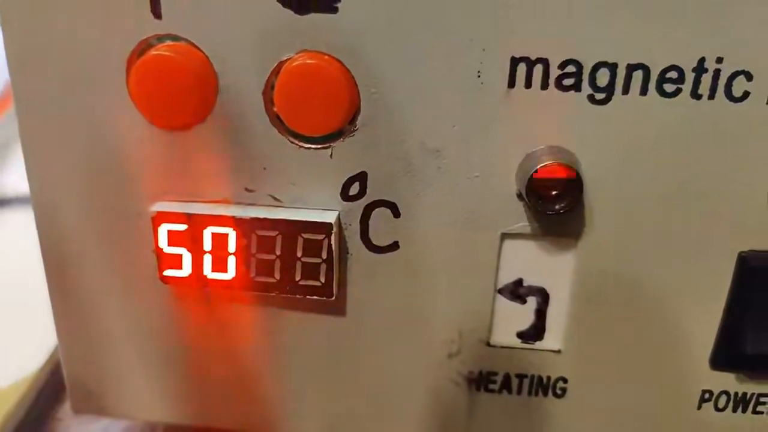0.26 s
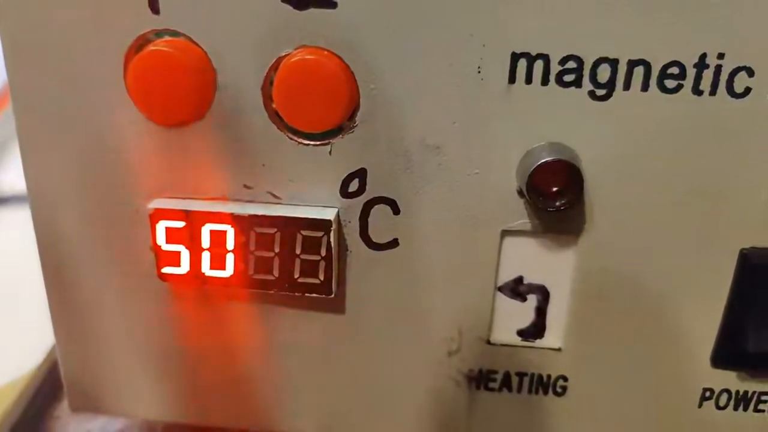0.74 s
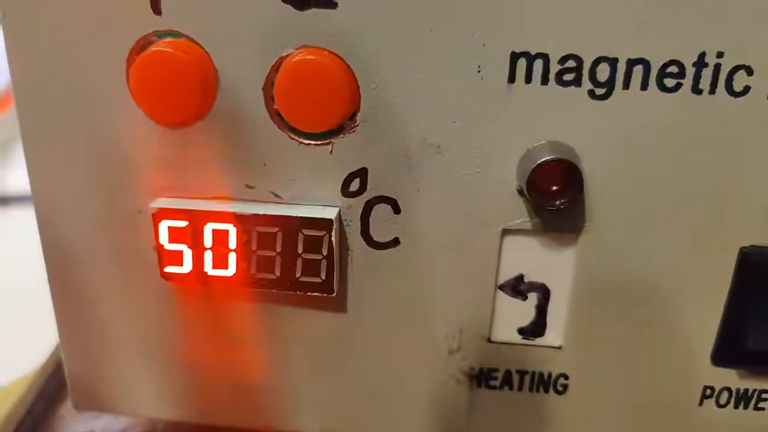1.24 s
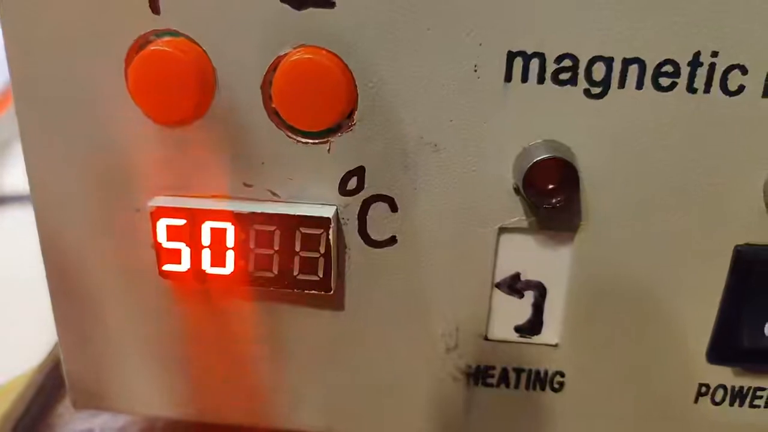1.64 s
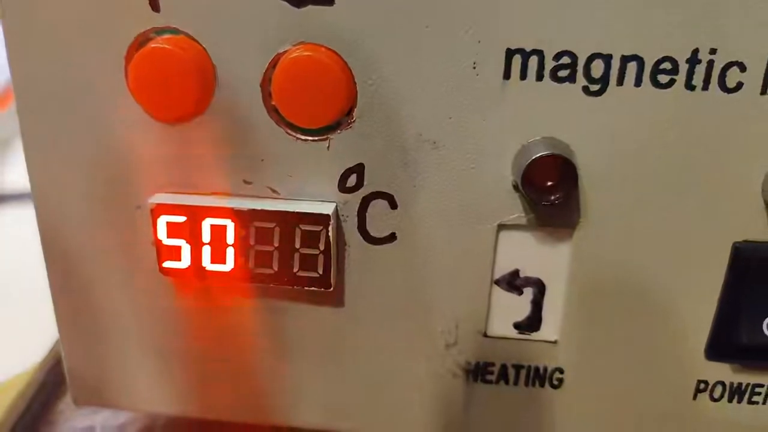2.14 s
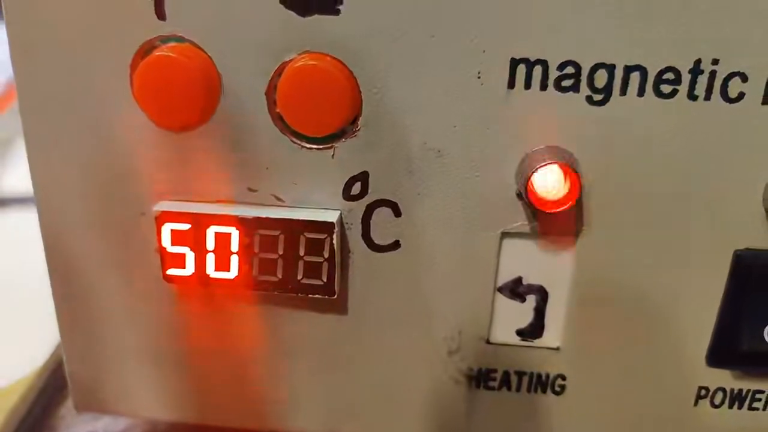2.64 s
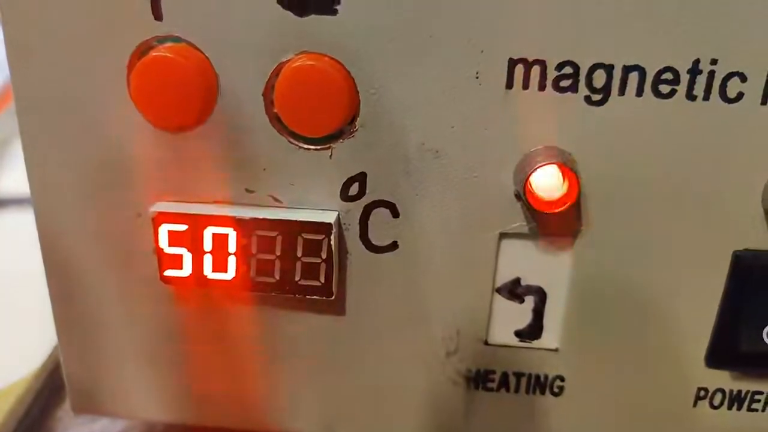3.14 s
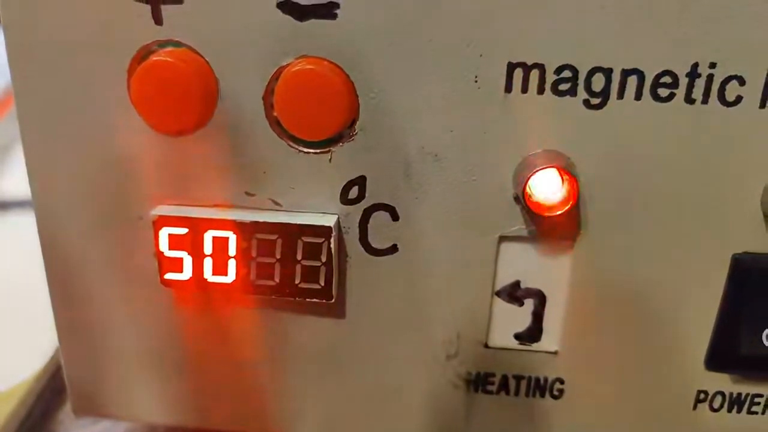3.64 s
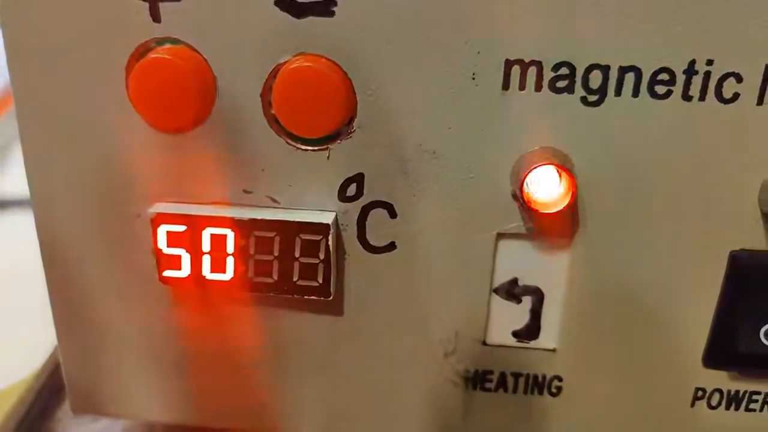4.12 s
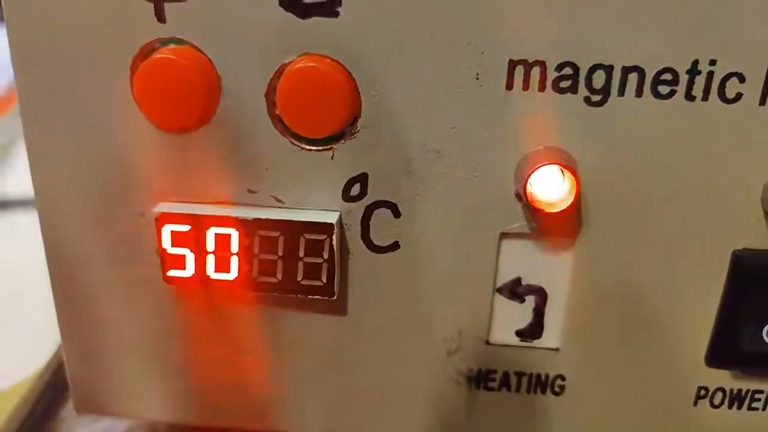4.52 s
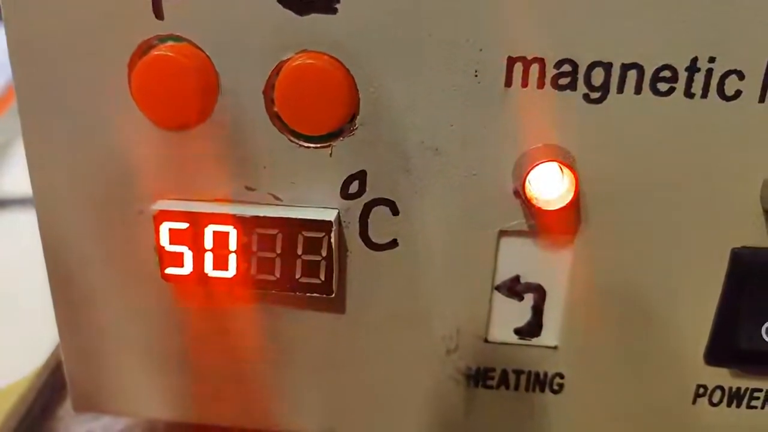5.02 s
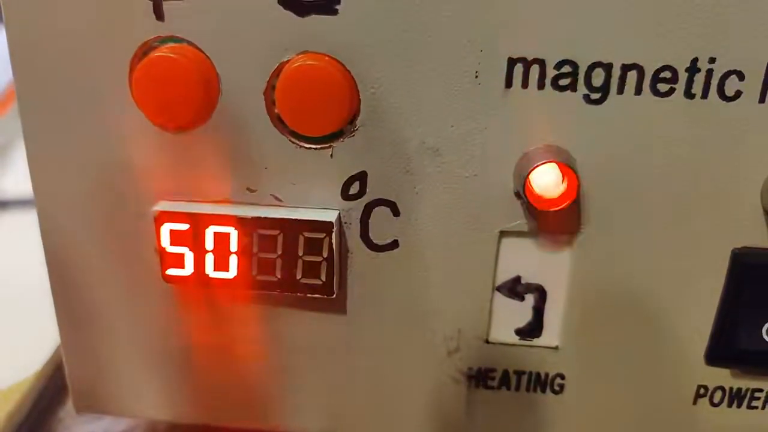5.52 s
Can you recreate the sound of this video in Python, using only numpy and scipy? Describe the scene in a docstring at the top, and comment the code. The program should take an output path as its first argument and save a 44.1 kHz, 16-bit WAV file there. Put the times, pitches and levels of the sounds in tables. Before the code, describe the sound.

A hot-plate stirrer hums low and quiet while its stir bar ticks now and then against the vessel. A small relay clicks lightly twice, and the ticking turns into a fine, steady rattle with a faint whine. The relay then chatters in a much louder run of sharp, uneven clicks for about two seconds and stops, leaving the hum and ticking. It is heard close by in a small room.

```python
"""A low motor hum and light, stray ticks, likely a stir bar against its vessel, close by in a small room.
The heater relay of this hot-plate stirrer clicks twice, then chatters for two seconds: its armature
snaps against the core and bounces in short rattles. Each impact excites the damped modes of the relay's
parts and of the metal case. From the second click on, the ticking is steady and faint tones join it."""
import sys
import numpy as np
from scipy import signal
from scipy.fft import rfft, irfft
from scipy.io import wavfile
from scipy.ndimage import map_coordinates

SR = 44100
rng = np.random.default_rng(int(sys.argv[2]) if len(sys.argv) > 2 else 0)


def materialize(psi):
    """Save the field psi as 16-bit PCM at rate SR to the path in sys.argv[1].

    A 1-D psi becomes a single channel; in a 2-D psi each row is a channel.
    """
    bounded = np.clip(np.atleast_2d(psi).T, -1, 1)
    quanta = np.round(bounded * 32767).astype(np.int16)
    wavfile.write(sys.argv[1], SR, quanta)


N = 254589
TIME = np.arange(N) / SR
BASS_PAN_DB = 8   # left minus right, for motor, whine and case
STEADY_START_S = 2.95   # the steady ticking begins


def from_db(db):
    """Amplitude ratio of a level in decibels."""
    return 10 ** (np.asarray(db) / 20)


def unit_rms(x):
    """Normalisation to an rms of 1."""
    return x / np.sqrt(np.mean(x ** 2) + 1e-20)


def pan(balance_db):
    """Level difference, left minus right, as two gains whose mean is 1."""
    left = from_db(np.atleast_1d(balance_db))
    return 2 * np.array([left, np.ones_like(left)]) / (1 + left)


def per_bin(points, size):
    """Interpolation of (f/Hz, value) points over log frequency, at the bins of an FFT."""
    hz, value = np.transpose(points)
    return np.interp(np.log(np.arange(size // 2 + 1) * SR / size + 1), np.log(hz), value)


def drift(per_s):
    """Smooth random modulation of rms 1, through per_s random values a second."""
    knots = rng.standard_normal(4000)
    return unit_rms(map_coordinates(knots, [TIME * per_s], order=3, mode="wrap"))


def resonate(drive, modes):
    """Modal superposition: damped resonators (f/Hz, bandwidth/Hz, gain/dB) add with alternating signs."""
    out = 0
    for k, (hz, width, db) in enumerate(modes):
        r = np.exp(-np.pi * width / SR)
        poles = [1, -2 * r * np.cos(2 * np.pi * hz / SR), r * r]
        gain = (-1) ** k * from_db(db) * (1 - r * r) / 2
        out = out + gain * signal.lfilter([1, 0, -1], poles, drive + 1e-18)
    return out


def impact_power(events, decay_s):
    """Exponential decay: power jumps at each (t/s, level/dB); decay_s is the amplitude's time constant."""
    power = np.zeros(N)
    for s, db in events:
        power[min(int(s * SR), N - 1)] += from_db(db) ** 2
    return signal.lfilter([1], [1, -np.exp(-2 / (decay_s * SR))], power + 1e-20)


def held_power(spells, edge_s):
    """Sustained excitation: power holds through each (start/s, end/s, level/dB), with soft edges."""
    power = np.zeros(N)
    for start, end, db in spells:
        power[int(start * SR):int(end * SR)] = from_db(db) ** 2
    r = np.exp(-1 / (edge_s * SR))
    return signal.lfilter([1 - r], [1, -r], power + 1e-20)


def micro_hits(per_s, spread_db):
    """Shot noise of rms 1: tiny contacts of uneven force at random moments."""
    force = from_db(spread_db * np.clip(rng.standard_normal(N), -2, 2)) * rng.choice([-1, 1], N)
    return unit_rms(force * (rng.random(N) < per_s / SR))


# spectrum of the room's background: f/Hz, relative spectral level/dB
AIR_SPECTRUM = [(18, -9.5), (30, -5), (45, -19.5), (104, -18), (145, -21.5), (200, -18.5), (360, -24),
                (730, -31), (1320, -33.5), (2400, -39.5), (6500, -46), (10000, -43), (14000, -37.5),
                (15800, -36)]
# likeness of its two sides: f/Hz, correlation coefficient
AIR_CORRELATION = [(60, 0.73), (240, 0.8), (950, -0.17), (3770, -0.31), (15000, -0.089)]
# its balance: f/Hz, left minus right level/dB
AIR_PAN = [(60, 8.5), (240, 6.5), (950, 6.5), (3770, 0.5), (15000, 5)]


def air(rms_db=-59):
    """Partially coherent noise: soft rumble and hiss, alike on both sides in the bass."""
    mid, side = rfft(rng.standard_normal((2, N)))
    alike = np.clip(per_bin(AIR_CORRELATION, N), 0, .98)
    white = np.sqrt(1 + alike) * mid + np.sqrt(1 - alike) * side * [[1], [-1]]
    noise = irfft(white * from_db(per_bin(AIR_SPECTRUM, N)) * pan(per_bin(AIR_PAN, N)), N)
    return from_db(rms_db) * unit_rms(noise)


# spectrum of the room's reflections: f/Hz, relative level/dB
REVERB_SPECTRUM = [(200, 7.5), (400, 12), (600, 7.5), (850, 0.5), (2000, 5.5), (3500, 7.5), (4200, 6),
                   (5800, -1.5), (6700, 0), (7600, -0.5), (8500, 3), (10500, -1.5), (16000, 0)]


def room(sound, t60_s=0.3, first_echo_s=0.00192):
    """Reverberation: dense reflections decay exponentially, different on each side."""
    size = SR // 2
    t = TIME[:size]
    tail = rng.standard_normal((2, size)) * from_db(-60 * t / t60_s)
    tail = irfft(rfft(tail) * from_db(per_bin(REVERB_SPECTRUM, size)), size) * (t > first_echo_s)
    tail /= np.sqrt(np.sum(tail ** 2, axis=1, keepdims=True))
    return signal.fftconvolve(sound, tail, axes=1)[:, :N]


# partials of the stirrer motor's hum: f/Hz, level/dB
MOTOR_PARTIALS = [(18.9, -52), (56.7, -62), (90.3, -66), (120, -75), (182, -73.5)]


def motor(wander_cycles=0.11, waver_db=0.1):
    """Line spectrum of a turning motor: low partials, slightly modulated in level and phase."""
    hum = 0
    for hz, db in MOTOR_PARTIALS:
        amplitude = np.sqrt(2) * from_db(db + waver_db * np.tanh(drift(per_s=2.36)))
        cycles = hz * TIME + wander_cycles * drift(per_s=1.372)
        hum += amplitude * np.sin(2 * np.pi * cycles)
    return hum * pan(BASS_PAN_DB)


# faint tones that accompany the steady ticking: f/Hz, level/dB
WHINE_TONES = [(522.2, -78), (597.5, -80), (635.2, -74), (753.7, -73)]


def whine(gain_db=-1, onset_s=0.067):
    """Superposed pure tones: a thin whine swells in as the steady ticking begins, then holds."""
    tones = sum(from_db(db) * np.sin(2 * np.pi * hz * TIME + rng.uniform(0, 2 * np.pi))
                for hz, db in WHINE_TONES)
    envelope = np.clip((TIME - STEADY_START_S + onset_s) / onset_s, 0, 1)
    return np.sqrt(2) * from_db(gain_db) * envelope * tones * pan(BASS_PAN_DB)


# stray contacts of the stir bar: t/s
STRAY_TICKS = [0.338, 0.3676, 0.4038, 0.592, 0.6036, 0.6403, 0.7074, 0.885, 0.9659, 0.981, 1.0273, 1.2044,
               1.297, 1.3192, 1.3876, 1.4332, 1.439, 1.8361, 2.212, 2.2558, 2.4376, 2.495, 2.616, 2.6339,
               2.75, 2.7822, 2.85, 2.9006, 2.9234]
# modes of the vessel: f/Hz, bandwidth/Hz, gain/dB
VESSEL_RESONANCES = [(625, 81, 3), (780, 164, 0.5), (2860, 880, -13.5), (3170, 133, 1), (3570, 91, 4.5),
                     (4170, 190, -8.5), (4650, 150, -5), (6030, 63, -4), (7870, 1700, -17)]


def stir_bar(stray_db=-42.5, steady_db=-44, ticks_per_s=72, jitter=0.25, fade_db_per_s=0.3, spread_db=2.65):
    """Impact excitation: the bar rings its vessel, with stray ticks at first, then a light rattle."""
    beats = np.arange(400)
    time_scatter, level_scatter = rng.standard_normal((len(beats), 2)).T
    times = STEADY_START_S + (beats + jitter * time_scatter) / ticks_per_s
    levels = steady_db - fade_db_per_s * (times - STEADY_START_S) + spread_db * level_scatter
    steady = [(s, db) for s, db in zip(times, levels) if s < TIME[-1]]
    stray = [(s, stray_db) for s in STRAY_TICKS]
    force = np.sqrt(impact_power(stray, decay_s=0.0042) + impact_power(steady, decay_s=0.0077))
    grain = 0.27 * rng.standard_normal(N) + rng.standard_normal((2, N))   # partly shared by both sides
    return resonate(force * grain, VESSEL_RESONANCES) * pan(balance_db=3)


# armature snaps that stand out: t/s, level/dB
DISTINCT_SNAPS = [(2.0434, -55), (2.0456, -39), (2.952, -38), (3.2576, -46), (3.3554, -44), (3.4868, -49.5),
                  (3.587, -24), (3.6627, -23.5), (3.7533, -24), (3.8074, -29.5), (3.884, -24),
                  (3.95, -20.5), (3.9727, -24), (3.988, -24), (4.0125, -19), (4.041, -23), (4.074, -20),
                  (4.0844, -19), (4.1074, -19), (4.2587, -23), (4.307, -25.5), (4.373, -21),
                  (4.3874, -15.5), (4.4586, -20), (4.5033, -17.5), (4.5245, -20), (4.5498, -26),
                  (4.704, -19.5), (4.7914, -17), (4.8297, -19), (4.859, -24), (4.895, -22.5),
                  (4.9099, -18.5), (4.954, -19.5), (4.9707, -19.5), (4.9835, -21), (5.0064, -20.5),
                  (5.0355, -19.5), (5.0428, -23.5), (5.0548, -20.5), (5.0814, -18.5), (5.0965, -18.5),
                  (5.11, -19), (5.1292, -18.5), (5.147, -21.5), (5.1558, -19.5), (5.3495, -19.5),
                  (5.4632, -39.5)]
# spells of contact bouncing: start/s, end/s, relay level/dB, case level/dB
BOUNCE_SPELLS = [(2.038, 2.049, -34.5, -48.5), (2.946, 2.952, -40, -50), (3.588, 3.603, -32, -40.5),
                 (3.664, 3.668, -30, -40.5), (3.714, 3.725, -29, -39.5), (3.758, 3.761, -24, -39.5),
                 (3.803, 3.828, -33, -42.5), (3.848, 3.869, -37, -49), (3.88, 3.916, -29.5, -41),
                 (3.94, 4.018, -31, -45.5), (4.034, 4.053, -27, -44), (4.074, 4.081, -38, -43.5),
                 (4.129, 4.259, -27, -43), (4.275, 4.417, -31.5, -44.5), (4.458, 4.487, -25, -42),
                 (4.498, 4.561, -30, -44), (4.587, 4.679, -29, -41.5), (4.694, 4.793, -28.5, -43.5),
                 (4.824, 4.843, -32, -54), (4.851, 4.876, -28, -44), (4.893, 4.908, -27, -43.5),
                 (4.94, 4.99, -30, -46.5), (4.998, 5.06, -31.5, -45.5), (5.076, 5.112, -35, -46.5),
                 (5.141, 5.187, -30, -40), (5.207, 5.251, -28, -40.5), (5.262, 5.275, -28, -38.5),
                 (5.305, 5.313, -26.5, -38), (5.348, 5.363, -32, -42), (5.389, 5.402, -29, -37)]
# force of the repeated closings over the course of the chatter: t/s, level/dB
CLOSING_LEVELS = [(3.55, -43), (3.9, -33.5), (4.18, -23), (4.5, -23.5), (4.79, -25), (4.84, -29),
                  (5.25, -45)]


def armature_snaps(gap_s=0.0095, jitter=0.5, spread_db=1):
    """Contact chatter as (t/s, level/dB): distinct snaps, and quasi-periodic closings in each spell."""
    snaps = list(DISTINCT_SNAPS)
    distinct_s = np.array(DISTINCT_SNAPS)[:, 0]
    for start, end, _, _ in BOUNCE_SPELLS:
        gaps = gap_s * (1 + jitter * rng.uniform(-0.83, 1, size=24))
        times = start + np.cumsum(gaps) - gaps[0] / 2
        levels = np.interp(times, *np.transpose(CLOSING_LEVELS))
        levels += spread_db * rng.standard_normal(len(times))
        snaps += [(s, db) for s, db in zip(times, levels)
                  if s < end and np.abs(distinct_s - s).min() > gap_s / 2]
    return snaps


# modes of the case panels: f/Hz, bandwidth/Hz, gain for bounces/dB, gain for snaps/dB
PANEL_MODES = [(47.3, 20.3, 6.5, 4.5), (172, 54, -3.5, 0.5), (224, 54, -2, -0.5), (335.6, 28, 2, 4.5),
               (467, 310, -4.5, -17), (601, 36, 5, -10), (818.6, 52.6, 13, 8.5), (970, 155, 4.5, 10.5),
               (1053.6, 89, 4.5, 13), (1366, 45, -5, -2), (1654, 142, -7.5, 2)]


def case(snaps, swell, shake_db=10, knock_db=-5, unshared_db=-9, travel_s=0.00046):
    """Structure-borne sound: contacts cross the mounting and ring the panels with a hollow note."""
    def transmitted(db, firm_db):
        """Nonlinear loss: the mounting soaks up contacts lighter than firm_db."""
        return db + 0.52 * min(db - firm_db, 0)

    shakes = [(start, end, shake_db + transmitted(db, firm_db=-46)) for start, end, _, db in BOUNCE_SPELLS]
    knocks = [(s + travel_s, knock_db + transmitted(db, firm_db=-27)) for s, db in snaps]
    shake = swell * np.sqrt(held_power(shakes, edge_s=0.0015))
    knock = np.sqrt(impact_power(knocks, decay_s=0.0015))
    grain = micro_hits(per_s=5000, spread_db=2) + from_db(unshared_db) * rng.standard_normal((2, N))
    shaken = resonate(shake * grain, [(hz, width, db) for hz, width, db, _ in PANEL_MODES])
    knocked = resonate(knock * grain, [(hz, width, db) for hz, width, _, db in PANEL_MODES])
    return (shaken + knocked) * pan(BASS_PAN_DB)


# modes of the relay's frame and cover: f/Hz, bandwidth/Hz, left gain/dB, right gain/dB, left-right likeness
FRAME_MODES = [(2900, 310, -10.5, -8, -1.06), (3040, 102, -0.5, -2.5, -0.19), (3580, 129, 5, -13, -0.72),
               (4003, 114, 1, 1.5, -0.19), (4867, 377, 7.5, -42, .3), (5350, 110, -32, 5.5, -0.28),
               (5766, 540, 3.5, 6, 0.39), (6130, 375, 7, 5, 0.64), (6780, 130, 2, -12, -0.1),
               (7480, 156, -5, 5, -0.76), (7740, 235, 4, -12, 0.26), (8640, 1050, 2, 3, 0.0021),
               (9420, 120, 10.5, -6, 0.43), (10110, 1020, 0.5, 0.5, -0.37), (12130, 414, 7, 1.5, 0.25),
               (14360, 490, 3.5, 4.5, 0.14), (14700, 270, -20, -14, .5), (15260, 240, 6, -3, 0.1)]


def relay(snaps, swell, lead_in_db=-15, strike_db=9.5, snap_db=3, rattle_db=-3, flutter_db=4,
          lead_in_s=0.0033, right_lag_s=0.00025, soft_hz=14000):
    """Modal ringing after impact: the armature snaps home and bounces, driving frame and cover."""
    # a faint lead-in is heard just before each snap
    lead_in = impact_power([(s - lead_in_s, db + lead_in_db) for s, db in snaps], decay_s=0.0034)
    snap = impact_power([(s, db + snap_db) for s, db in snaps], decay_s=0.0022)
    spells = [(start, end, db + rattle_db) for start, end, db, _ in BOUNCE_SPELLS]
    rattle = swell * np.sqrt(held_power(spells, edge_s=0.002)) * from_db(flutter_db * drift(per_s=450))
    # the first touch of each snap is one hard strike, which reaches the left side first
    drives = np.zeros((2, N))
    for s, db in snaps:
        drives[0, int(s * SR)] = drives[1, int((s + right_lag_s) * SR)] = from_db(db + strike_db)
    # bounces are softer contacts than snaps, so they carry less treble
    soften = signal.butter(1, soft_hz, fs=SR)
    for drive in drives:
        drive += np.sqrt(snap + lead_in) * micro_hits(per_s=36000, spread_db=3)
        drive += signal.lfilter(*soften, rattle * micro_hits(per_s=14000, spread_db=5.5))
    near, far = drives
    out = np.zeros((2, N))
    for k, (hz, width, left_db, right_db, alike) in enumerate(FRAME_MODES):
        alike = np.clip(alike, -1, 1)
        right_drive = alike * near + np.sqrt(1 - alike ** 2) * far
        out[0] += (-1) ** k * resonate(near, [(hz, width, left_db)])
        out[1] += (-1) ** k * resonate(right_drive, [(hz, width, right_db)])
    return out


def scene(swell_db=0.5, click_reverb_db=-11, tick_reverb_db=-12):
    """Superposition: direct and reverberant clicks and ticks, over motor, whine and air."""
    snaps = armature_snaps()
    swell = from_db(swell_db * drift(per_s=79))   # the bouncing swells and slackens
    clicks = relay(snaps, swell) + case(snaps, swell)
    ticks = stir_bar()
    reverb = room(from_db(click_reverb_db) * clicks + from_db(tick_reverb_db) * ticks)
    return clicks + ticks + reverb + motor() + whine() + air()


def record(dry, cutoff_hz=15900):
    """Band limiting: a steep elliptic low-pass removes the highest treble."""
    return signal.sosfilt(signal.ellip(10, .2, 70, cutoff_hz, fs=SR, output="sos"), dry)


dry = scene()
out = record(dry)
materialize(out)
```